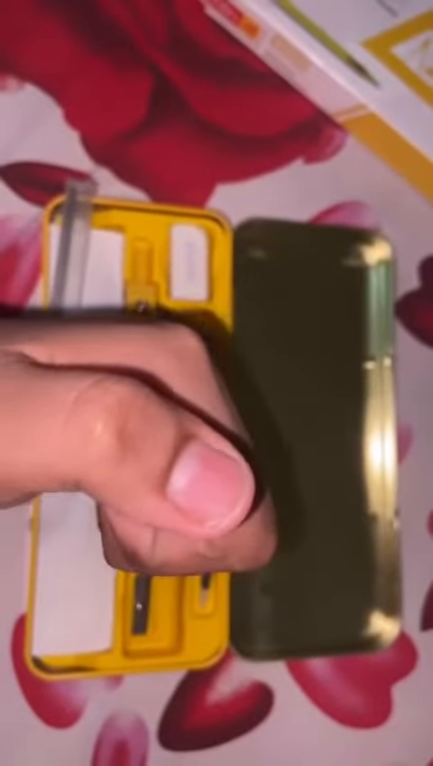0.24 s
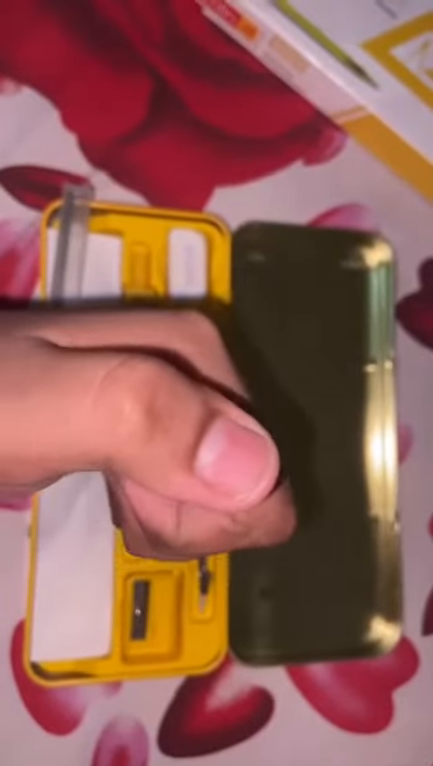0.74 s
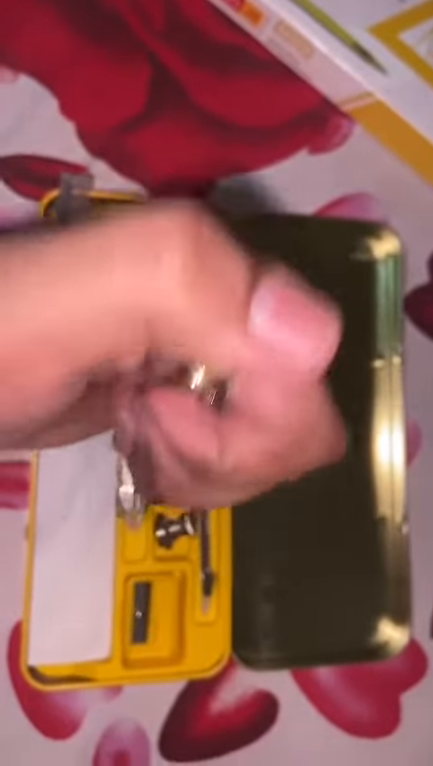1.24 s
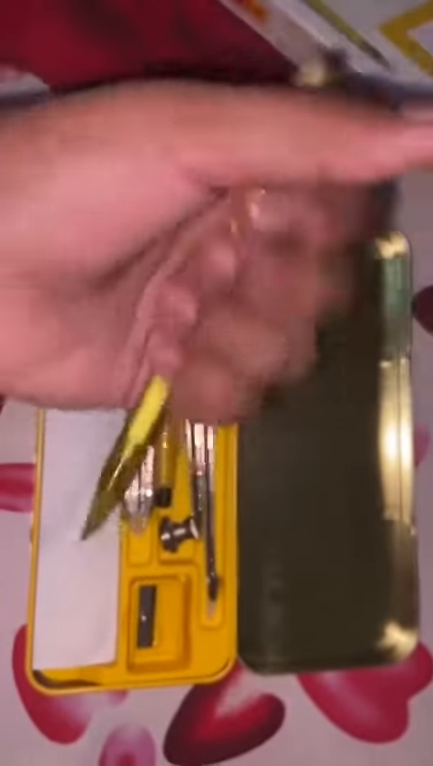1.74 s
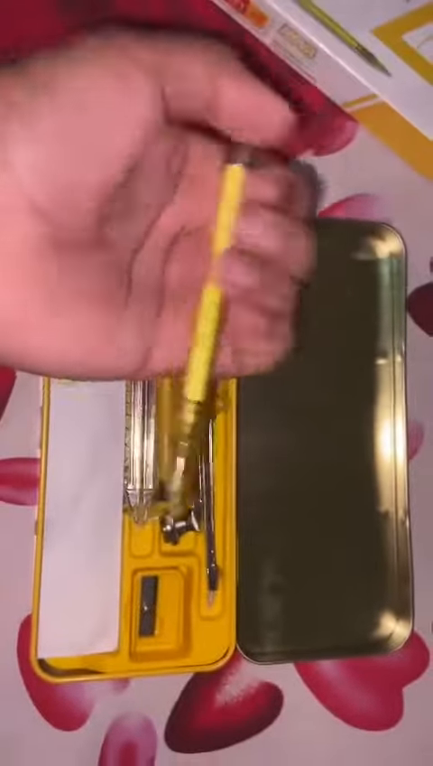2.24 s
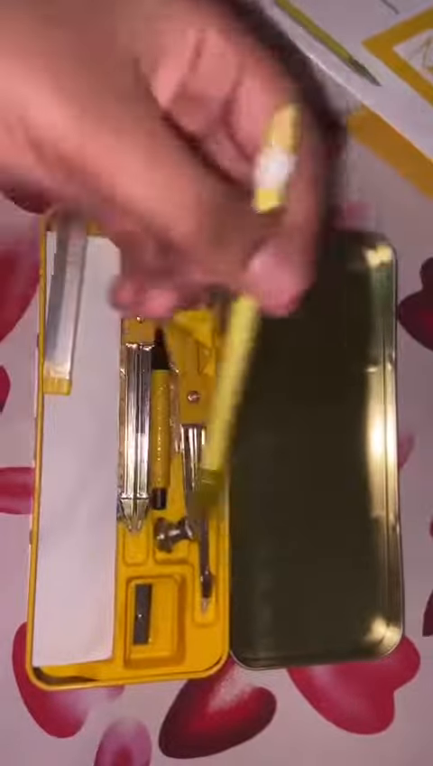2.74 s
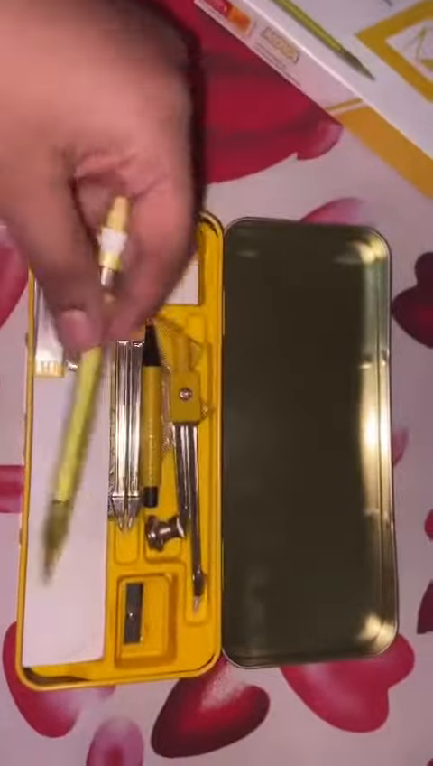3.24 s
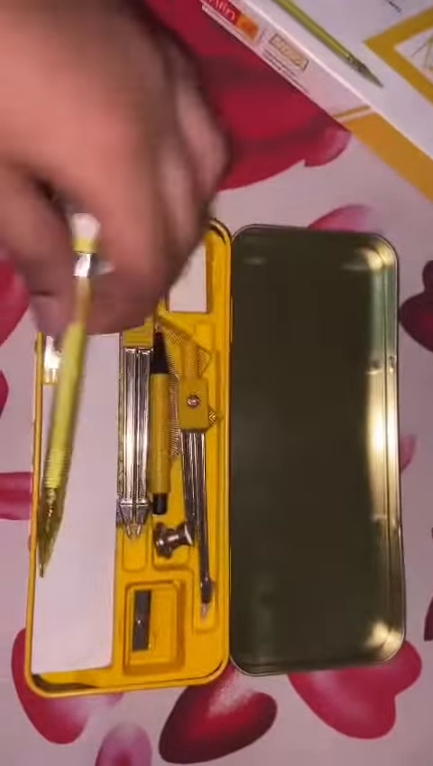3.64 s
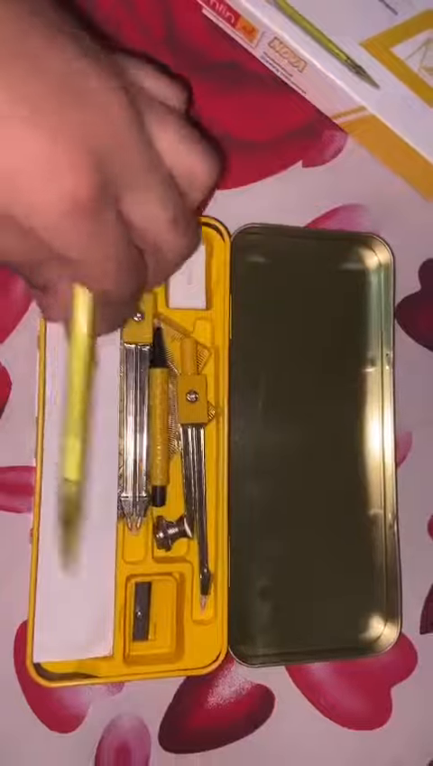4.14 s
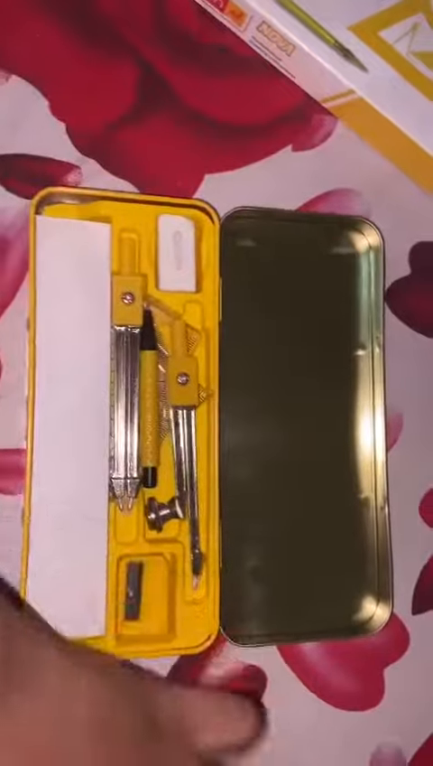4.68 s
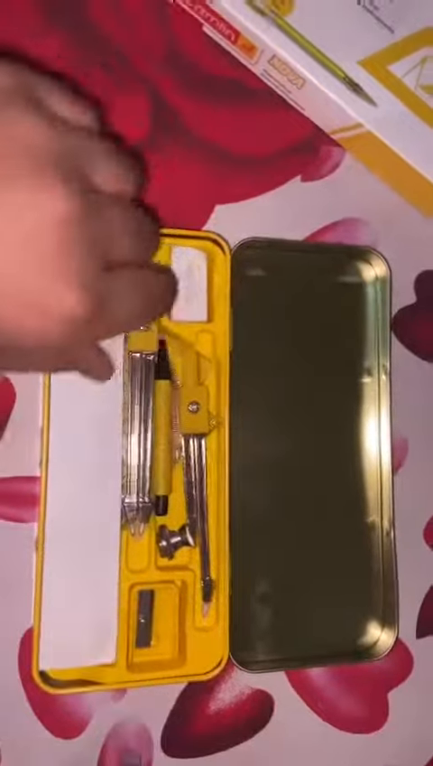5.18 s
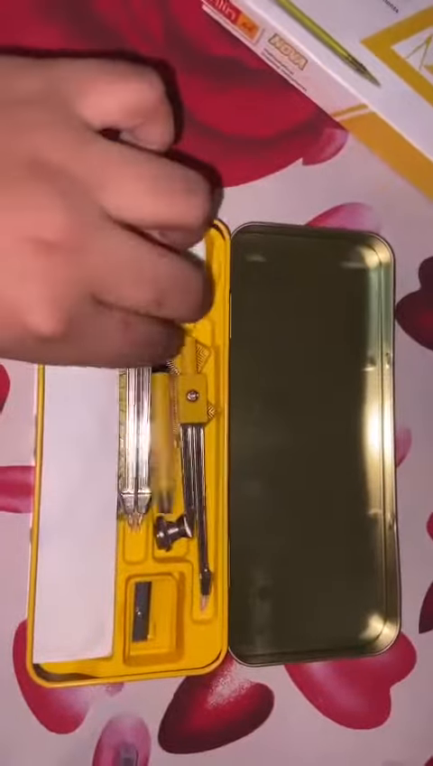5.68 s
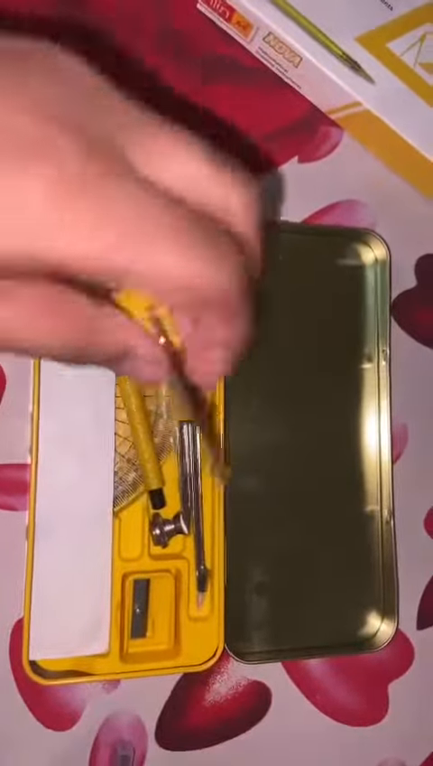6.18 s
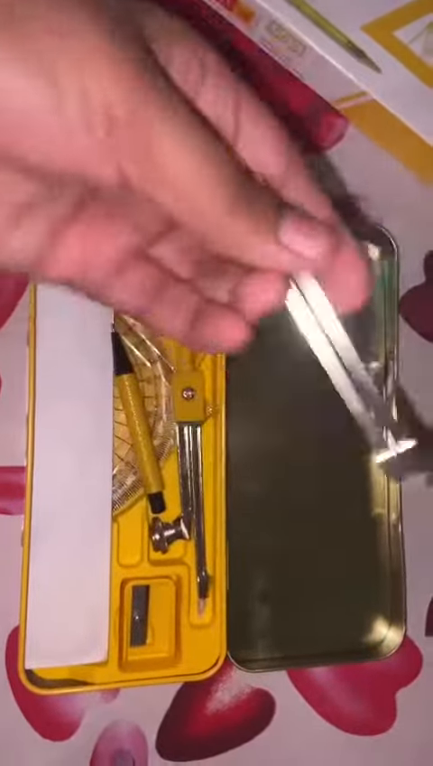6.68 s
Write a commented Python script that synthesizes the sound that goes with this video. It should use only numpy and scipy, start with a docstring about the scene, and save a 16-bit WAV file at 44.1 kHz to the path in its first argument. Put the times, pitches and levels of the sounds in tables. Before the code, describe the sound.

A quiet small room with low rumble, faint hum and soft hiss, heard close up. From 0 to 1 s there is almost nothing but faint cloth swish and tiny ticks at 0.4. Light plastic clicks come at 1.1, 1.4 and 1.5, with very faint touches and a dull knock up to 2.5. At 2.97 a crisp double clack starts a busy clatter: the loudest sharp knock at 3.27, then strong clicks at 3.57 and 3.69 and a denser, softer rattle at 3.85 to 3.95, with hollow tray knocks, scuffs and gentle dragging. It thins by 4.1, leaving near silence, one small click at 4.75 and a soft low bump. Duller tinny rattles resume at 5.05, fiddly clicks run from 5.4, with a brighter snap at 5.54, then a final cluster at 5.98 with a brief high steel ting. Afterwards only quiet finger rubbing and faint scuffs remain until 7 s.

```python
"""Pencil and dividers lifted from a tin case

A hand lifts a lead pencil and a pair of dividers out of a plastic tray in a tin case lying on a cloth.
Each contact is a chatter of tiny impacts, with rebounds, exciting damped modes of tray, tin, plastic and steel.
Hollow knocks, dragging and scuffs join it, and the room echoes them; a few steel modes ring on alone.
Low bumps are damped sines; rubbing fingers and the swish on cloth are shaped noise.
Beneath lies room tone: coloured noise and narrow resonant bands.
"""
import sys
import numpy as np
from scipy import signal
from scipy.fft import rfft, irfft, next_fast_len
from scipy.io import wavfile

SR = 44100
rng = np.random.default_rng(int(sys.argv[2]) if len(sys.argv) > 2 else 0)


def log_audio(samples):
    """Write samples as a 16-bit WAV file to the path given in sys.argv[1]."""
    # one column per channel
    frames = np.atleast_2d(samples).T
    # limit to full scale, then quantise
    limited = np.clip(frames, -1, 1)
    pcm = np.round(limited * 32767).astype(np.int16)
    wavfile.write(sys.argv[1], SR, pcm)


N = 304907  # length in samples

# contacts: [t/s, relative strength/dB, weight on tray and tin/dB, hardness for steel/dB, favoured f/Hz, chatter/ms]
CONTACTS = [(0.3932, -42.5, -10, -0.5, 2190, 2.4), (0.3979, -35, -8.5, -24, 2450, 1.3),
            (0.42, -46.5, -2, -3.0, 1600, 2.2), (1.1094, -36, -18, 1.5, 2380, 2.1),
            (1.1236, -43, -7, -2.5, 2480, 1.2), (1.3881, -29.5, -24, -5, 2250, 1.4),
            (1.509, -38, -14, -5.5, 3040, 3), (1.5151, -40.5, -15, 0.5, 2450, 1.3),
            (1.892, -64, 2, 4.5, 7760, 2.6), (1.965, -51.5, -9, -1.5, 4540, 2.6),
            (2.254, -46, -13, 2.5, 4270, 1.7), (2.2648, -41, -11, -1.5, 4190, 3.4),
            (2.299, -46.5, -6.5, -4, 4190, 6.5), (2.317, -48, -8, -3, 4200, 3.4),
            (2.453, -52, 10, -16, 1110, 4.3), (2.4597, -50.5, 9, -12, 1020, 1.2),
            (2.466, -52, 14, -6, 1010, 2.6), (2.9694, -21, -4, -3, 3150, 3.3),
            (2.9727, -15.5, -9, -3, 3200, 1.8), (2.9772, -26, -3, -1.0, 1193, 2.2),
            (2.9921, -18.5, -4.5, -3, 2650, 5.3), (2.9956, -26.5, -7, -2, 2720, 2.3),
            (3.0183, -39.5, 2, -2.5, 1610, 3.6), (3.0718, -44, -8, 1.5, 8900, 0.92),
            (3.0788, -38, -9, -8, 2660, 2.6), (3.1, -41.5, 1.5, -4, 1414, 3.8),
            (3.1158, -42, -1, -0.5, 2800, 7.8), (3.2522, -30, -8, -5.0, 2680, 4.1),
            (3.266, -6, -11, -3.0, 2206, 1.5), (3.268, -11, -7, -2, 2750, 3.4),
            (3.331, -29, -4, -9.0, 2280, 6), (3.3421, -22.5, -3.5, 0, 4460, 2.4),
            (3.4733, -32.5, -1, -2.0, 3640, 2.1), (3.4884, -38.5, -1, 1.5, 2290, 2.6),
            (3.571, -14, -6, 3.5, 2300, 3.5), (3.5765, -13.5, -1, -3.0, 2770, 5.2),
            (3.5903, -24, -4, -3, 2300, 1.7), (3.6226, -30.5, -4, -20, 2350, 3),
            (3.6549, -32.5, 3.5, -13, 2370, 5.7), (3.6769, -26, -3, -5.5, 3080, 2.9),
            (3.6824, -15, -2, -2.5, 3830, 2.4), (3.6902, -11, -4.5, -4, 2560, 1.8),
            (3.7098, -35.5, -5, 1.5, 2390, 3.1), (3.808, -40.5, -1, -4.5, 2940, 3.5),
            (3.857, -20.5, -1.5, -5, 2840, 3), (3.8646, -27.5, -3, -4, 2890, 2.8),
            (3.8709, -27.5, 0, -11, 1510, 2.6), (3.8791, -33, 6, -1.5, 1740, 2.9),
            (3.895, -31, -1, -7, 2400, 1.5), (3.9019, -17, -5, -9, 1476, 1.7),
            (3.9086, -25.5, 1, -1.5, 1400, 2.6), (3.9192, -20.5, -6, -6.0, 2900, 3),
            (3.934, -30.5, -1, -3, 1730, 7.6), (3.9523, -34.5, -5, -1.5, 2800, 1.6),
            (3.963, -38, -1.5, -3, 1720, 3.8), (3.996, -39, -3, -4, 2900, 2.1),
            (4.0684, -44, -5, -4.5, 3020, 3.7), (4.251, -58, 0, 7.5, 8700, 1.6),
            (4.6299, -54, -5, 5.5, 9100, 2.6), (4.7501, -30, -10, -3.5, 4230, 1.1),
            (5.042, -33.5, 4, -3, 1550, 1.2), (5.0478, -39, 6, -4, 1580, 2.6),
            (5.055, -38, 3, -2, 1210, 4.2), (5.0666, -23, -4, -7.0, 1570, 3.6),
            (5.077, -23, 5, -7.5, 1720, 2.1), (5.082, -30, 4, -5, 1340, 3),
            (5.132, -45.5, 2, -5.5, 1480, 3.4), (5.169, -46.5, 0, -5, 1660, 2.2),
            (5.201, -38, -6.5, -9, 2700, 5), (5.22, -34.5, -9, -3.0, 3570, 3.8),
            (5.373, -52, -4, 0.5, 1520, 2.7), (5.4095, -46, -10, -4, 2950, 2.2),
            (5.464, -49, 0, 0, 1610, 2.6), (5.479, -34, -1, -2, 4060, 1.9),
            (5.4877, -34.5, 2, -4, 4120, 2.8), (5.515, -31.5, 8, 0, 1250, 4.4),
            (5.543, -16, -11, -7.5, 3230, 1.4), (5.592, -38, -10, 5, 6800, 0.99),
            (5.6, -29, -2.5, 1.5, 2980, 2.6), (5.6243, -36, 0, -1, 4100, 2.6),
            (5.6363, -28, -8.5, -6.5, 1510, 4), (5.682, -34.5, 1, -2, 4150, 3),
            (5.7024, -29, -6, -0.5, 1000, 1.5), (5.7644, -35, -2.5, -7.5, 1600, 1.9),
            (5.8246, -41.5, -3.5, -8.5, 3210, 2.6), (5.9077, -38.5, 3, -6.0, 1610, 3.1),
            (5.9134, -30, 6.5, -2.5, 1370, 1.3), (5.9232, -34, 4, -5, 1290, 2.9),
            (5.938, -49.5, 13, -3, 1230, 3.5), (5.98, -21.5, 1, -4, 1400, 3.2),
            (5.9882, -20.5, -8, -1.5, 1430, 2.3), (5.9933, -21, -3, -8, 1450, 2.7),
            (6.0098, -22, 2.5, -5.5, 1380, 1.9)]
# damped modes of each part, low to high: [f/Hz, relative level/dB, t60/s]
TRAY_MODES = [(300, -5, .016), (395, -2, .018), (470, -5, .014), (760, -4, .012)]
TIN_MODES = [(1010, -4, .014), (1230, -2, .016), (1380, -1, .018), (1520, -1, .016), (1680, -2, .012)]
PLASTIC_MODES = [(2100, -4, .008), (2290, -1, .014), (2430, -2, .012), (2720, -2, .01), (2920, -1, .014),
                 (3130, -3, .009), (3400, -3, .008)]
LEG_MODES = [(3690, 0, .011), (3980, -2, .009), (4180, -1, .013), (4600, -2, .008), (5135, -2, .009),
             (5750, -2, .009), (6100, -3, .008)]
TIP_MODES = [(6330, 7, 0.0029), (7300, 0, 0.0046), (7880, 5, 0.0022), (9006, -3.5, 0.0099),
             (9760, -3, 0.0012), (10080, -4.5, 0.0067), (11070, -8.5, 0.0087)]
# response of tray, tin, plastic, legs and tips: [relative level/dB]
PART_DB = [-8.5, -1, -2.5, 0.5, 2.5]
# multiple of the chatter time felt by the same five parts: [ratio]
CHATTER_SHARE = [1.4, 1.7, 1.2, 1, 1.5]
# hollow knocks of the tray against the case: [t/s, relative strength/dB]
KNOCKS = [(1.79, -44.5), (2.453, -31.5), (2.4644, -26), (2.9723, -27), (2.9784, -28.5), (3.2663, -19.5),
          (3.2686, -16), (3.3423, -25), (3.4751, -31.5), (3.57, -18.5), (3.5765, -15), (3.6238, -32),
          (3.6894, -36), (3.8787, -28.5), (3.9182, -28), (5.0483, -25.5), (5.054, -27), (5.076, -23.5),
          (5.544, -30.5), (5.6827, -29.5), (5.7013, -30.5), (5.9138, -32), (5.9222, -26.5), (5.982, -26),
          (5.9875, -25)]
# modes of the hollow under the tray: [f/Hz, relative level/dB, t60/s]
HOLLOW_MODES = [(296, -5, 0.02), (405, -1, .028), (480, -6, 0.011), (760, -6, 0.019)]
# parts dragging over the tray, as strokes: [peak t/s, level/dB, rise/s, fall/s]
DRAGS = [(3.05, -59.5, .3, 0.17), (3.316, -56, .08, 0.11), (3.73, -72, .09, .3), (3.898, -52, 0.21, 0.11),
         (5.16, -64.5, 0.27, 0.51), (5.62, -56, .22, 0.25), (5.9, -58, .25, .12)]
# short scuffs of skin and plastic: [t/s, length/s, level before the swell/dB, low f/Hz, high f/Hz]
SCUFFS = [(0, 0.086, -65, 1200, 3470), (.2, 0.045, -65, 1510, 3340), (1.099, 0.017, -51, 1800, 9000),
          (1.388, 0.012, -53, 1800, 6000), (1.774, 0.04, -63, 400, 4970), (2.216, 0.051, -62, 3000, 11000),
          (2.285, 0.085, -57.5, 2390, 11000), (3.065, 0.072, -49.5, 860, 3800),
          (3.212, 0.13, -48, 980, 9000), (3.86, 0.042, -51, 1000, 8000), (4.297, 0.035, -63, 4930, 10000),
          (5.033, 0.035, -39, 500, 4000), (5.161, 0.078, -55.5, 1495, 9000),
          (5.365, 0.065, -58.5, 995, 7040), (5.488, 0.018, -49.5, 806, 7900),
          (5.662, 0.076, -49, 500, 2900), (5.73, 0.042, -66, 600, 3530), (5.81, 0.074, -66, 1190, 5040),
          (6.42, 0.068, -64, 5040, 10900), (6.654, 0.054, -56, 3200, 11200),
          (6.714, 0.0085, -55, 4100, 11350)]
# free ringing of a steel part: [t/s, level/dB, f/Hz, t60/s]
PINGS = [(2.254, -38, 4190, 0.024), (2.2646, -47, 4220, .02), (5.6242, -37, 4170, .015),
         (5.6832, -35, 4180, .015), (5.98, -30, 5135, 0.046), (5.988, -21.5, 5135, 0.041)]
# soft bumps of the hand on the table: [t/s, nominal level/dB, f/Hz]
BUMPS = [(3.584, -47, 69), (3.699, -46, 69.5), (3.919, -44.5, 69.6), (4.781, -41, 68), (5.06, -43.5, 70.5)]
# fingers sliding on pencil, tray and cloth, as strokes: [peak t/s, level/dB, rise/s, fall/s]
RUBS = [(2.55, -61.5, 0.29, 0.45), (3.58, -46, 0.0094, 0.1), (3.85, -56, 0.17, 0.19),
        (4.98, -60.5, .2, 0.18), (5.44, -72.5, 0.22, 0.65), (5.92, -72.5, 0.19, 0.66), (6.8, -60, 0.34, 1)]
# spectrum of skin friction: [f/Hz, relative level per hertz/dB]
RUB_COLOUR = [(500, -20), (1200, -6), (2500, -3), (4200, 0), (7000, -3), (10500, -2), (14000, -10)]
# the hand moving over the cloth, as strokes: [peak t/s, level/dB, rise/s, fall/s]
SWISHES = [(0.01, -64, .1, 1.55), (3.2, -66.5, 2.1, .3), (3.8, -68, 0.22, 0.5), (4.67, -71, 1.05, 1.4),
           (5.68, -62.5, 0.23, 0.44), (6.6, -71, 0.62, 5.1)]
# spectrum of the broad room tone: [f/Hz, relative level per hertz/dB]
ROOM_COLOUR = [(15, -30), (25, -8.5), (106, -7.5), (138, 1), (169, -8), (358, -10), (386, -14), (883, -23),
               (1110, -21), (2360, -20), (3470, -25), (7940, -29.5), (12000, -31.5), (15600, -59.5),
               (22000, -120)]
# narrow wavering bands in the room tone: [f/Hz, width/Hz, level/dB]
HUMS = [(49, 6.4, -63), (91, 8.3, -66.5), (138, 3.3, -66.5), (365.2, 54, -68.5), (8000, 210, -75)]

FAVOUR_DB, FAVOUR_WIDTH = 9, 0.061  # lift of modes near the favoured pitch, width as a log frequency ratio
NEARBY_DB, NEARBY_WIDTH = 3, .2  # gentler lift of the whole neighbourhood of that pitch
REBOUND_S, REBOUND_SPREAD = 0.016, 0.33  # typical gap, spread of its logarithm
FIRST_LOSS_DB, NEXT_LOSS_DB = 20, 7.5  # strength lost by the first rebound, and further by each next one
REBOUND_SOFTENS_DB = 0.5  # hardness of every rebound below that of its contact
KNOCK_CHATTER_S = 0.00298
STROKE_SWING_DB = 12  # change of level within the rise or fall time of a stroke
ECHO_DB, ECHO_T60_S, ECHO_CUT_HZ = -24.5, 0.24, 4500
ROOM_DB = -59.5
HEADROOM = .95  # amplitude that rounded peaks approach
CUTOFF_HZ = 12700


def from_db(db):
    """Amplitude ratio: 20 dB is a factor of ten."""
    return 10 ** (np.asarray(db) / 20)


def rms_one(x):
    """Normalisation by the root mean square."""
    return x / np.sqrt(np.mean(x ** 2) + 1e-20)


def filtered(x, order, hz, kind):
    """Butterworth filtering: a maximally flat pass band."""
    return signal.sosfilt(signal.butter(order, hz, kind, fs=SR, output="sos"), x)


def drift(rate_hz):
    """Slow random modulation: noise through two one-pole low-passes, spread 1."""
    pole = np.exp(-80 * np.pi * rate_hz / SR)  # computed at every 40th sample
    noise = rng.standard_normal(N // 40 + 2002)
    slow = signal.lfilter([1], [1, -2 * pole, pole * pole], noise)[2000:]  # drop the settling
    return np.interp(np.arange(N) / 40, np.arange(len(slow)), rms_one(slow))


def ring(x, hz, t60):
    """Damped resonator: a unit click starts a decaying sine of height 1."""
    radius = from_db(-60 / (t60 * SR))
    angle = 2 * np.pi * hz / SR
    feedback = [1, -2 * radius * np.cos(angle), radius * radius]
    return signal.lfilter([0, np.sin(angle)], feedback, x + 1e-18)


def coloured(spectrum):
    """Spectral shaping: white noise weighted in frequency, rms 1."""
    hz, level_db = np.transpose(spectrum)
    size = next_fast_len(N)
    log_hz = np.log(np.arange(size // 2 + 1) * SR / size + 1)  # the 1 avoids log(0)
    gain = from_db(np.interp(log_hz, np.log(hz), level_db))
    return rms_one(irfft(rfft(rng.standard_normal(size)) * gain, size)[:N])


def strokes(rows):
    """Exponential growth and decay: levels rise and fall linearly in dB; powers add."""
    t = np.arange(N) / SR
    power = np.zeros(N)
    for peak_s, peak_db, rise, fall in rows:
        distance = np.maximum((peak_s - t) / rise, (t - peak_s) / fall)
        power += from_db(peak_db - STROKE_SWING_DB * distance) ** 2
    return np.sqrt(power)


def chatter(seconds):
    """Repeated impact: a first hit, then sparse uneven micro-impacts dying away, energy 1."""
    size = SR // 70
    hits = rng.standard_normal((len(seconds), size))
    hits *= rng.random((len(seconds), size)) < .15
    hits[:, 0] = 1.24
    hits *= np.exp(-np.arange(size) / (np.maximum(seconds, 1e-4)[:, None] * SR))
    return hits / np.sqrt(np.sum(hits ** 2, axis=1, keepdims=True))


def placed(s, force):
    """Superposition: force pulses, one per row, add up at their start times."""
    at = (s[:, None] * SR).astype(int) + np.arange(force.shape[1])
    return np.bincount(at.ravel(), force.ravel(), N)


def with_rebounds(table, count=2):
    """Inelastic rebound: each contact is followed by weaker, softer ones."""
    spread = np.exp(REBOUND_SPREAD * rng.standard_normal((len(table), count)))
    delays = np.cumsum(REBOUND_S * spread, axis=1)
    rows = [table]
    for k in range(count):
        change = np.zeros_like(table)
        change[:, 0] = delays[:, k]
        change[:, 1] = -FIRST_LOSS_DB - NEXT_LOSS_DB * k
        change[:, 3] = -REBOUND_SOFTENS_DB
        rows.append(table + change)
    return np.vstack(rows)


def contacts():
    """Modal excitation: weight drives tray and tin, hardness the steel; the spot struck favours some modes."""
    s, strength_db, weight_db, hardness_db, favoured_hz, chatter_ms = with_rebounds(np.array(CONTACTS)).T
    drive_db = [weight_db, weight_db, 0, hardness_db, 2 * hardness_db]
    out = np.zeros(N)
    for k, modes in enumerate([TRAY_MODES, TIN_MODES, PLASTIC_MODES, LEG_MODES, TIP_MODES]):
        part = np.zeros(N)
        for hz, mode_db, t60 in modes:
            # impacts wander, so each mode feels its own
            force = chatter(CHATTER_SHARE[k] * chatter_ms / 1000)
            interval = np.log(favoured_hz / hz)
            favour_db = FAVOUR_DB * np.exp(-(interval / FAVOUR_WIDTH) ** 2)
            favour_db += NEARBY_DB * np.exp(-(interval / NEARBY_WIDTH) ** 2)
            chance_db = rng.normal(0, 1.8, len(s))
            level_db = strength_db + drive_db[k] + PART_DB[k] + mode_db + favour_db + chance_db
            part += ring(placed(s, force * from_db(level_db)[:, None]), hz, t60)
        # a small part radiates little outside the range of its modes
        out += filtered(part, 3, [.82 * modes[0][0], 1.5 * modes[-1][0]], "band")
    return out / 2


def knocks():
    """Cavity resonance: a soft, short push rings the hollow under the tray."""
    s, strength_db = np.transpose(KNOCKS)
    out = np.zeros(N)
    for hz, mode_db, t60 in HOLLOW_MODES:
        force = chatter(np.full(len(s), KNOCK_CHATTER_S))
        out += ring(placed(s, force * from_db(strength_db + mode_db)[:, None]), hz, t60)
    return filtered(out, 3, [200, 1000], "band") / 2


def dragging():
    """Stick-slip excitation: dense uneven slips ring the tin floor and the plastic."""
    slips_per_s = 2500 * from_db(5 * drift(40))
    slips = rng.standard_normal(N) * (rng.random(N) < slips_per_s / SR)
    body = np.zeros(N)
    for hz, mode_db, t60 in TIN_MODES + PLASTIC_MODES:
        signs = rng.choice([-1, 1], N)  # each mode feels the slips with its own signs
        body += from_db(mode_db) * ring(slips * signs, hz, t60)
    return strokes(DRAGS) * rms_one(filtered(body, 2, 700, "high"))


def scuffs():
    """Friction noise: band-limited grainy bursts swell and fade."""
    out = np.zeros(N)
    grain = rng.standard_normal(N) * from_db(2.2 * drift(120))
    for s, length, level_db, low_hz, high_hz in SCUFFS:
        start, size = round(s * SR), round(length * SR)
        band = filtered(grain[start:start + size], 2, [low_hz, high_hz], "band")
        swell = np.sqrt(np.hanning(size))
        out[start:start + size] += from_db(level_db) * rms_one(band) * swell
    return out


def pings():
    """Free vibration: one clear steel mode each, decaying exponentially."""
    out = np.zeros(N)
    for s, peak_db, hz, t60 in PINGS:
        out += from_db(peak_db) * ring(signal.unit_impulse(N, round(s * SR)), hz, t60)
    return out


def bumps():
    """Heavily damped vibration: the table top gives two or three low swings."""
    out = np.zeros(N)
    for s, level_db, hz in BUMPS:
        t = np.maximum(np.arange(N) / SR - s, 0)
        envelope = np.e * t / 0.0089 * np.exp(-t / 0.01)  # crests 10 ms after the start
        out += from_db(level_db) * np.sin(2 * np.pi * hz * t) * envelope
    return out


def rubbing():
    """Skin friction: bright, slightly grainy broadband noise."""
    grain = from_db(1.2 * drift(80))
    return grain * strokes(RUBS) * coloured(RUB_COLOUR)


def swish():
    """Fabric friction: skin on cloth gives soft, dull mid-band noise."""
    band = filtered(rng.standard_normal(N), 2, [450, 1100], "band")
    return strokes(SWISHES) * from_db(0.89 * drift(8)) * rms_one(band)


def echoes(x):
    """Reverberation: convolution with a dense decaying tail, thin in the bass and dull on top."""
    t = np.arange(SR // 2) / SR
    onset = np.minimum(t / .01, 1)
    tail = rng.standard_normal(len(t)) * from_db(-60 * t / ECHO_T60_S) * onset
    tail = filtered(tail, 1, [900, ECHO_CUT_HZ], "band")
    return from_db(ECHO_DB) * signal.fftconvolve(x, tail / np.sqrt(np.sum(tail ** 2)))[:N]


def room_tone():
    """Stationary noise: gently swelling hiss and rumble, with noise-driven narrow resonances."""
    swell_db = .6 * drift(1.5)
    out = from_db(ROOM_DB + swell_db) * coloured(ROOM_COLOUR)
    for hz, width_hz, hum_db in HUMS:
        t60 = np.log(1000) / (np.pi * width_hz)  # a narrower band decays more slowly
        out += from_db(hum_db) * rms_one(ring(rng.standard_normal(N), hz, t60))
    return out


def scene():
    """Linear superposition: the case sounds and their echoes, hand sounds and the room."""
    case = contacts() + knocks() + dragging() + scuffs()
    hand = bumps() + rubbing() + swish()
    return (case + echoes(case) + pings() + hand + room_tone())[None]


def record(dry):
    """Band limiting and saturation: the microphone drops low bass, rounds peaks and loses the top."""
    mic = filtered(dry, 4, 38, "high")
    mic = mic / (1 + (mic / HEADROOM) ** 6) ** (1 / 6)
    mic = filtered(mic, 6, 11600, "low")
    return signal.sosfilt(signal.cheby2(12, 50, CUTOFF_HZ, fs=SR, output="sos"), mic)  # steep final cut


dry = scene()
out = record(dry)
log_audio(out)
```